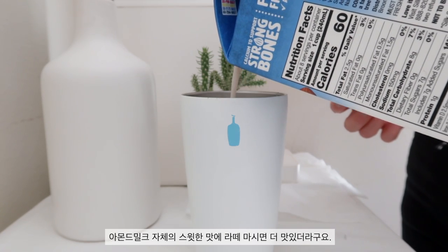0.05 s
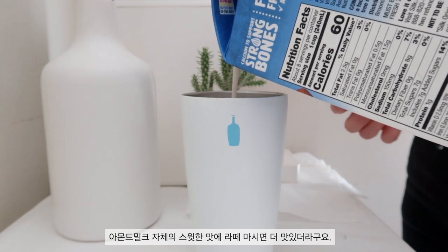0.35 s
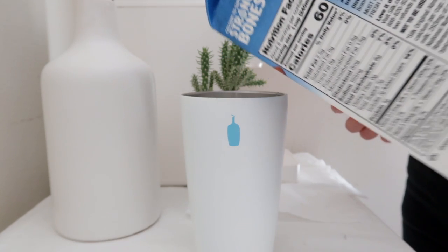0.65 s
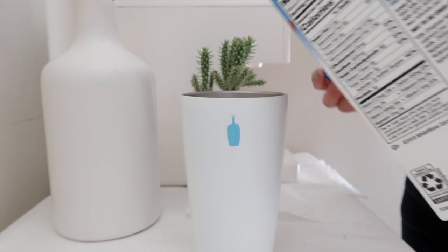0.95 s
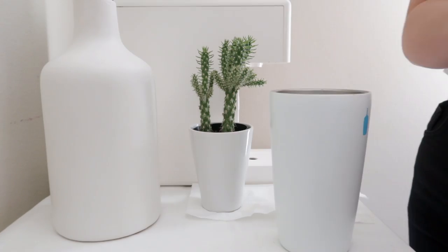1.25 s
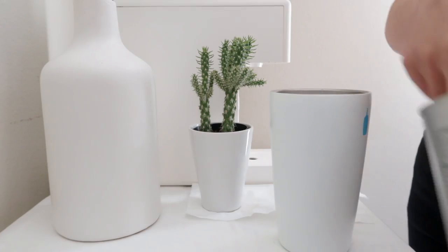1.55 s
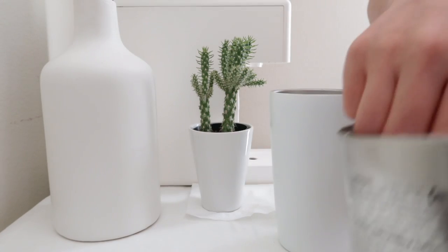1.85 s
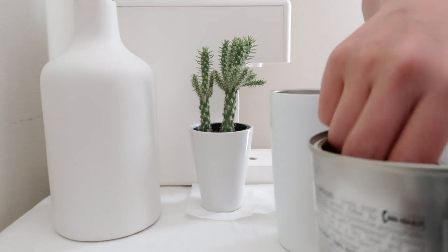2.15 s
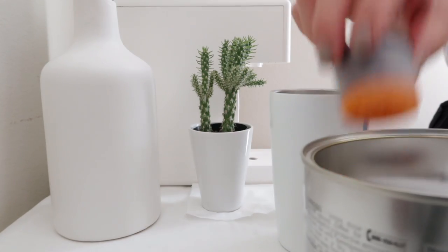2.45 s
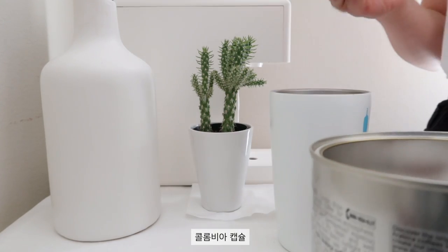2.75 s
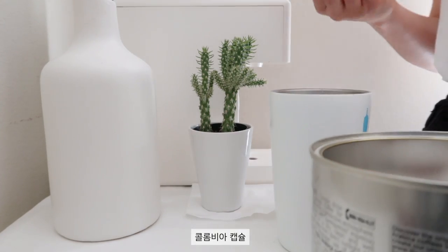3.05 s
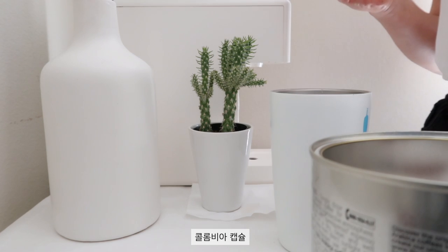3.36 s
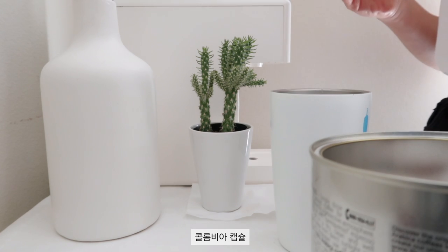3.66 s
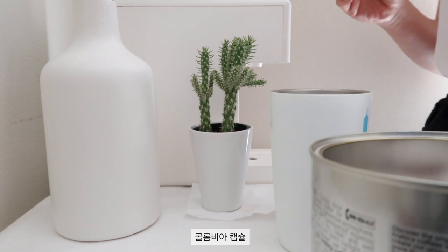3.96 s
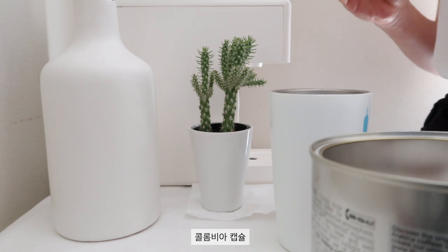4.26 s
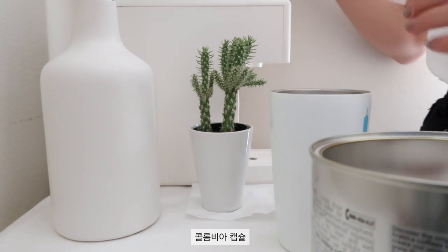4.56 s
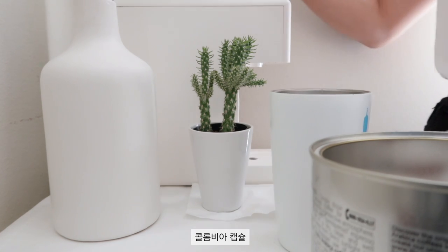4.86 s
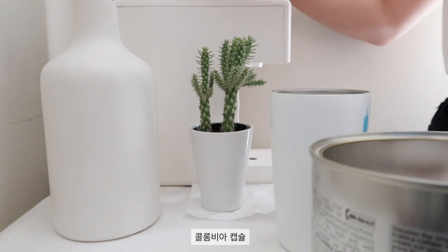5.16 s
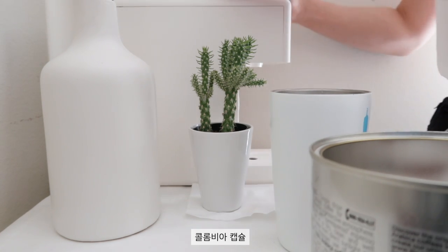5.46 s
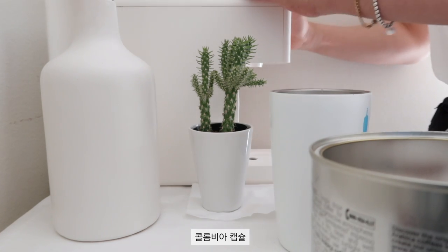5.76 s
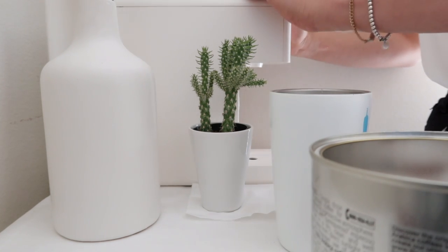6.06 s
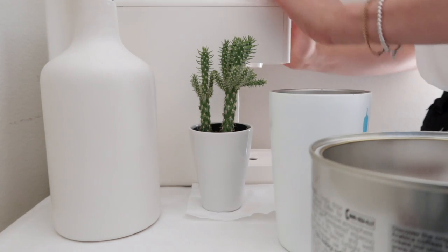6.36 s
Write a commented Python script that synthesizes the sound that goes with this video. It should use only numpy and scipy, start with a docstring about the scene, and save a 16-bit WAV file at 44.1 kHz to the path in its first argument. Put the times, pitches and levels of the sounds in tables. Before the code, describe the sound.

Right at the start, a drop plinks briefly into a cup in a quiet kitchen. From about 1.3 seconds a thin metal tin is pulled across the counter, scraping and knocking, and a hand rummages among the coffee capsules inside. They rattle and slide against the ringing wall, with the brightest clinks near 2.0 and 2.4 seconds, and settle by 2.8. A faint, distant motor hum rises with the rummaging, then slowly sinks in pitch and fades over soft room noise. Around 4.9 seconds an arm brushes softly past. Small plastic clicks follow from 5.2 as a coffee machine's lever opens, with a sharper clack and slight spring ring at 5.7. The capsule goes in with light rubbing and another clack near 6.2. At about 6.5 seconds the lid is pressed shut with two dull thumps that boom through the counter. The handling sounds close, with little reverberation.

```python
"""Loading a coffee machine

A drop plinks into a cup as its bubble rings. A metal tin is pulled across a kitchen counter and a hand
rummages for a capsule: impacts and stick-slip friction excite the modes of the thin wall. The lever of
a plastic coffee machine opens, the capsule drops in and the lid is pressed shut, with damped clacks
that boom through the counter. Behind it all lie faint room noise and a slowly sinking motor hum."""
import sys
import numpy as np
from scipy import signal
from scipy.fft import rfft, irfft
from scipy.io import wavfile
from scipy.ndimage import uniform_filter1d, map_coordinates

SR = 44100
rng = np.random.default_rng(int(sys.argv[2]) if len(sys.argv) > 2 else 0)


def inscribe(sig):
    """Save sig as 16-bit PCM at rate SR to the path in sys.argv[1].

    A 1-D sig is mono; a 2-D sig holds one channel per row.
    Samples are clipped to [-1, 1] before scaling.
    """
    pcm = np.round(np.clip(np.atleast_2d(sig).T, -1, 1) * 32767)
    wavfile.write(sys.argv[1], SR, pcm.astype(np.int16))


N = 291942
TIME = np.arange(N) / SR
HIT_SIZE = 8192   # samples in one impact

# edges of the six registers thud, body, clank, clink, ting and tick (frequency [Hz])
REGISTERS = [100, 450, 1100, 2100, 3500, 7500, 16000]
# two microphone ports cancel in the bass and oppose in the treble (frequency [Hz], side over mid [dB])
WIDTH = [(60, -36), (200, -29.5), (700, -25), (1300, -21), (2400, -12.5), (4400, -2.5), (6000, -2.5),
         (8000, 5.5), (15000, 7.5)]
# capsules and fingers striking the tin (time [s], strength [dB], contact time [s], chatter t60 [s],
# then for each of the struck spot's three modes: frequency [Hz], relative level [dB])
TIN_KNOCKS = [ (1.256,-52,0.00083,0.095,625,-46,1600,-53,1920,-63),
              (1.295,-44,0.0024,0.15,562,-32.5,930,-44,1380,-35),
              (1.3641,-48,0.0002,0.11,750,-29,965,-33.5,1438,-24),
              (1.377,-38,0.0027,0.04,518,-30,926,-30,1640,-35),
              (1.447,-48.5,0.0021,0.4,640,-41,1610,-40,2100,-42),
              (1.507,-47.5,0.00039,0.25,590,-32.5,1540,-32.5,3190,-42),
              (1.517,-43,.0025,0.11,581,-27,940,-38,1580,-37),
              (1.554,-43.5,0.00088,0.084,980,-34,1325,-27.5,3210,-32.5),
              (1.561,-38.5,0.00079,0.098,774,-29.5,1605,-29.5,2120,-36),
              (1.59,-36,0.0008,0.033,603,-32.5,2110,-28.5,2640,-30.5),
              (1.602,-50,0.00046,0.031,604,-41,1380,-45,3930,-39.5),
              (1.7084,-36.5,0.0038,0.035,650,-46.5,885,-27.5,1324,-31),
              (1.7795,-38.5,0.0018,0.016,713,-30.5,920,-34.5,1465,-29),
              (1.788,-30,0.001,0.05,602,-33,810,-25.5,1482,-27),
              (1.8186,-33.5,.002,0.03,629,-22.5,910,-31,1410,-29.5),
              (1.827,-41.5,0.00086,0.06,680,-46,1640,-29,2480,-35),
              (1.872,-39.5,.0018,0.026,616,-28,880,-31,1590,-37),
              (1.8798,-30.5,0.00096,0.024,581,-23,1405,-24,1576,-17),
              (1.8992,-35,0.00046,0.045,619,-29.5,1720,-25.5,3150,-39.5),
              (1.9233,-38,0.0018,0.015,578,-24,1360,-29.5,1520,-29),
              (1.9505,-41,0.00018,0.06,920,-35,1706,-34.5,2460,-28),
              (1.972,-45,.0004,0.048,584,-36,1710,-50,2600,-40.5),
              (1.983,-35.5,0.00015,0.092,546,-22.5,1757,-24.5,5115,-16),
              (2.013,-40,0.0017,0.028,560,-34.5,904,-45.5,1730,-42),
              (2.151,-52.5,0.00026,0.25,504,-38.5,1700,-47,2387,-44.5),
              (2.1995,-40,.005,.035,567,-27.5,956,-33,1643,-40.5),
              (2.218,-43.5,.005,0.022,590,-49,933,-43.5,1360,-49.5),
              (2.2453,-47,0.00039,0.075,520,-35,1480,-35,2240,-47),
              (2.279,-41.5,0.0025,0.13,620,-49,850,-47,1390,-50.5),
              (2.336,-45.5,0.00066,0.053,617,-32.5,1400,-40,2280,-39),
              (2.3559,-33,0.00057,0.1,634,-22,970,-25.5,1884,-22),
              (2.377,-36,0.0005,0.1,643,-21,1020,-30.5,1950,-21),
              (2.458,-41,0.00052,0.028,582,-20,1254,-34.5,2120,-41),
              (2.487,-45.5,0.00065,.07,649,-28.5,1390,-38,1710,-43),
              (2.498,-45.5,.0008,0.034,632,-37,1378,-29.5,1650,-33.5),
              (2.621,-53.5,0.00058,0.18,560,-53,2280,-59,5360,-65),
              (2.645,-39.5,.00096,0.049,545,-30,1043,-35.5,1456,-28),
              (2.757,-51.5,0.002,0.19,480,-47,1540,-48,2290,-64),
              (2.824,-70,0.00025,0.18,510,-54,3500,-60,5400,-62),
              (3.009,-76,0.00037,0.11,1850,-61.5,2085,-54,2700,-57)]
# high, lightly damped modes of the tin's wall (frequency [Hz], relative level [dB])
WALL_MODES = [(1512, -5.5), (1706, -7.5), (1912, -2.5), (2277, 3.5), (2558, -9), (2769, -9.5), (2859, -0.5),
              (3560, 3), (5124, 5.5), (5400, 2), (6271, 4.5)]


def from_db(db):
    """Amplitude ratio of a level in decibels."""
    return 10 ** (np.asarray(db) / 20)


def rms_one(x):
    """Normalisation to unit mean power."""
    return x / np.sqrt(np.mean(x ** 2) + 1e-20)


def in_time(points):
    """Linear interpolation of a curve at every sample."""
    return np.interp(TIME, *np.transpose(points))


def at_hz(points, hz):
    """Interpolation on a logarithmic frequency axis."""
    frequency, value = np.transpose(points)
    return np.interp(np.log(np.maximum(hz, 1)), np.log(frequency), value)


def bins(size):
    """Frequencies of a discrete Fourier transform."""
    return np.arange(size // 2 + 1) * SR / size


def drift(cutoff_hz):
    """Low-passed noise: a smooth random fluctuation of unit power."""
    white = rfft(rng.standard_normal(N))
    return rms_one(irfft(white / (1 + (bins(N) / cutoff_hz) ** 2), N))


def stereo(pair, width=WIDTH):
    """Sum and difference turn mid and side spectra into left and right."""
    side = from_db(at_hz(width, np.linspace(0, SR / 2, pair.shape[-1])))
    return (pair[0] + side * pair[1] * [[1], [-1]]) / np.sqrt(1 + side ** 2)


def widened(tone):
    """A side signal in quadrature sets left and right apart in phase."""
    spectrum = rfft(tone)
    return irfft(stereo(np.array([spectrum, 1j * spectrum])), len(tone))


def noise(spectrum, width=WIDTH):
    """Stationary stereo noise of a given spectral shape and unit power."""
    white = rfft(rng.standard_normal((2, N)))
    return rms_one(irfft(stereo(white, width) * from_db(at_hz(spectrum, bins(N))), N))


def ring(hz, t60, swell_s):
    """Free vibration of one mode: a sinusoid that builds up and decays exponentially."""
    t = np.arange(HIT_SIZE) / SR
    return np.exp(-np.log(1000) * t / t60) * (1 - np.exp(-t / swell_s)) * np.sin(2 * np.pi * hz * t)


def rings(rows, swell_s):
    """Superposition of decaying modes, each shortened further by a linear fade."""
    out = np.zeros(N + HIT_SIZE)
    fade = np.linspace(1, 0, HIT_SIZE)
    for s, hz, db, t60 in rows:
        at = int(s * SR)
        out[at:at + HIT_SIZE] += from_db(db) * ring(hz, t60, swell_s) * fade
    return out[:N]


def resonance(hz, centre, width):
    """Frequency response of a two-pole resonator with unit peak gain."""
    delay = np.exp(-2j * np.pi * hz / SR)
    radius = np.exp(-np.pi * width / SR)
    poles = 1 - 2 * radius * np.cos(2 * np.pi * centre / SR) * delay + (radius * delay) ** 2
    return (1 - radius ** 2) / 2 * (1 - delay ** 2) / poles


def body(modes, size, dense_db, dense_hz):
    """Modal superposition: an object's main resonances stand over a bed of dense, damped ones."""
    # valleys where the response sinks (frequency [Hz], bandwidth [Hz], depth [0-1])
    valleys = [(480, 150, 0.7), (3740, 690, 0.4), (7420, 5900, 0.53), (14500, 2500, 0.2)]
    hz = bins(size)
    response = from_db(dense_db) / (1 + 1j * hz / dense_hz)
    for centre, width, db in modes:
        response += from_db(db) * resonance(hz, centre, width)
    for centre, width, depth in valleys:
        response *= 1 - depth * resonance(hz, centre, width)
    return response


def motor(steady_hz=42.15, slows_from_s=1.85, sag_hz_per_s=1.12, wander_hz=.06, waver_db=1.2):
    """A distant motor hums at multiples of its rotation rate, so its pitch sinks as it slows."""
    # partials of the hum (multiple of the rotation rate, relative level [dB])
    orders = [(2, -3), (3, -9.5), (4, -7), (4.5, -9.5), (6, -10), (7, -4), (10, -12)]
    # rise and fall of hum and rumble (time [s], level [dB])
    loudness = [(0, -74), (1.21, -73), (1.28, -53), (1.8, -51), (2.3, -59.5), (3.65, -52), (4.5, -59.5),
                (6.62, -68)]
    # standing waves of the room lift partials passing through (frequency [Hz], width [Hz], lift [dB])
    standing_waves = [(80.6, 1.1, 5), (115.66, 3.2, 15.5)]
    # rumble under the hum (frequency [Hz], relative spectral density [dB])
    rumble = [(30, -32.5), (60, -10), (120, -7), (200, -11.5), (280, 0.5), (400, -4.5), (500, -21),
              (900, -29.5), (16000, -91)]
    motor_db = in_time(loudness)
    rate = steady_hz - sag_hz_per_s * np.maximum(TIME - slows_from_s, 0)
    angle = 2 * np.pi * np.cumsum(rate + wander_hz * drift(2.4)) / SR
    hum = 0
    for multiple, db in orders:
        lift_db = sum(peak_db / (1 + (2 * (multiple * rate - hz) / width) ** 2)
                      for hz, width, peak_db in standing_waves)
        level_db = motor_db + db + waver_db * drift(7.2) + lift_db
        hum += from_db(level_db) * np.sin(multiple * angle + rng.uniform(0, 2 * np.pi))
    return from_db(1) * hum + from_db(motor_db - 7.5) * noise(rumble)


def room_noise():
    """Ambient noise in two slowly modulated layers: a deep rumble and a wider hiss."""
    # colours of the two layers (frequency [Hz], relative spectral density [dB])
    deep_spectrum = [(20, -9.5), (35, -17.5), (53, -0.5), (68, -2.5), (100, -14), (300, -47), (16000, -110)]
    hiss_spectrum = [(20, -26.5), (60, -12), (80, -4.5), (130, -5), (200, -9), (270, -2.5), (350, -17),
                     (600, -20), (1500, -25), (3500, -30.5), (4050, -31), (5000, -33.5), (12000, -45),
                     (14000, -73.5)]
    # their envelopes; the hiss sinks during the rummaging and comes back as it ends (time [s], level [dB])
    deep_level = [(0, -63), (.8, -62), (2.5, -66.5), (4.8, -59.5), (6, -63.5), (6.62, -56.5)]
    hiss_level = [(0,-61.5), (1.2,-62), (2.6,-66.5), (3.15,-62.5), (3.4,-61), (4.05,-60.5), (4.7,-61.7),
                  (6.62,-61)]
    # stereo spread of the hiss (frequency [Hz], side over mid [dB])
    hiss_width = [(60, -80), (110, -21.5), (200, -17.5), (380, 0), (700, -1), (2000, 1), (8000, 1),
                  (15000, 3)]
    deep = from_db(in_time(deep_level)) * noise(deep_spectrum)
    hiss = from_db(in_time(hiss_level)) * noise(hiss_spectrum, hiss_width)
    return deep + hiss


def drop():
    """Bubble resonance: a drop taps the surface in the cup, then the trapped air rings."""
    # partials of tap and bubble (time [s], frequency [Hz], level [dB], nominal t60 [s])
    plinks = [(.0332,1260,-36,0.0079), (.0335,2150,-40,0.0075), (.0332,3650,-41,0.0037),
              (.064,2063,-32.5,0.028), (.064,3240,-44,0.0061), (.0645,2310,-57,0.012),
              (.0646,1005,-53,0.055), (.065,1330,-44,.014), (.08,2170,-53,.014), (.0895,2020,-49,0.013)]
    return rings(plinks, swell_s=.0011)


def friction(strokes, knocks=(), stir_db=0, attack_s=.018, release_db_per_s=142.5, settle_db_per_s=157):
    """Envelope of rubbing: strokes and loose parts stirred by knocks are incoherent, so powers add."""
    power = np.zeros(N)
    for s, length, db in strokes:
        swell = np.clip((TIME - s) / attack_s, 0, 1)
        release_db = release_db_per_s * np.maximum(TIME - s - length, 0)
        power += (swell * from_db(db - release_db)) ** 2
    settling = from_db(stir_db - settle_db_per_s * TIME[:SR]) ** 2
    for s, db, *_ in knocks:
        at = int(s * SR)
        power[at:at + SR] += from_db(db) ** 2 * settling[:N - at]
    return np.sqrt(power)


def scrape(level, response, slips_per_s=2200, spread_db=2.5):
    """Stick-slip friction: a random train of tiny impulses drives an object's response."""
    slips = rng.random(N) < slips_per_s / SR
    strength = from_db(spread_db * np.minimum(rng.exponential(1, N), 4))
    force = stereo(rfft(slips * strength * rng.standard_normal((2, N))))
    return rms_one(irfft(force * response, N)) * level


def flexed(x, pitch_share=.018, flex_hz=14):
    """Frequency modulation: the hand flexes the wall, so its resonances waver."""
    shift = np.cumsum(pitch_share * drift(flex_hz))
    at = np.arange(N) + shift - uniform_filter1d(shift, SR // 4)   # less its trend, to keep the timing
    return np.array([map_coordinates(channel, [at], order=3) for channel in x])


def softened(hz, contact_s, edge_share=.1):
    """An impact acts as a low-pass (gain in dB): the longer the contact, the less treble."""
    cycles = hz * contact_s
    return -20 * np.log10(1 + cycles ** 2) - 10 * np.log10(1 + (cycles * edge_share) ** 2)


def register_gains(db, contact_s, thud_db, colour_db):
    """The object's colour and the contact time set a blow's amplitude in each register."""
    centres = np.sqrt(np.multiply(REGISTERS[1:-1], REGISTERS[2:]))
    softening_db = softened(centres, contact_s)
    upper_db = colour_db + softening_db[1:] - softening_db[0]
    return from_db(db + np.array([thud_db, 0, *upper_db]))


def spot(modes, t60, swell_cycles, knee_hz=600, damping=.37, split=.0041):
    """Mode splitting: an uneven wall rings in beating pairs, which die sooner above the knee."""
    tone = 0
    for hz, db in zip(modes[::2], modes[1::2]):
        decay_s = t60 * (knee_hz / max(hz, knee_hz)) ** damping
        pair = sum(ring(hz * (1 + side * split), decay_s, swell_cycles / hz) for side in (-1, 1))
        tone += from_db(db) * pair / 2
    return widened(tone)


def blows(rows, response, thud_db, colour_db, chatter_db, contact_db, crack_db, crack_s, rise_s,
          spot_db, spot_t60, swell_cycles, detune):
    """Impact excitation: a push, a crack and loose parts' chatter drive the body; the spot rings."""
    t, hz = np.arange(HIT_SIZE) / SR, bins(HIT_SIZE)
    attack = int(.018 * SR)
    age = t * (t < t[-attack])   # the end of the buffer wraps round to become the lead-in
    filters = [signal.butter(6, edges, "band", fs=SR, output="sos")
               for edges in zip(REGISTERS, REGISTERS[1:])]
    bands = np.abs([signal.sosfreqz(sos, hz, fs=SR)[1] for sos in filters])
    treble_decay = from_db(-.025 * np.outer(REGISTERS[:-1], age))   # dB per second per Hz
    push = from_db(contact_db) / (1 + 1j * hz / REGISTERS[3]) * np.array([[1], [0]])   # mid only
    out = np.zeros((2, N + HIT_SIZE))
    for s, db, contact_s, t60, *spot_modes in rows:
        crack = from_db(crack_db) * np.exp(-t / crack_s)
        envelope = (np.exp(-np.log(1000) * t / t60) + crack) * (1 - np.exp(-t / rise_s))
        chatter = rfft(rng.standard_normal((2, HIT_SIZE)) * envelope) / np.linalg.norm(envelope)
        # the changing grip shifts the resonances a little from blow to blow
        gripped = np.interp(hz * (1 + detune * rng.standard_normal()), hz, response)
        parts = irfft(bands[:, None] * gripped * stereo(push + chatter)) * treble_decay[:, None]
        attack_rms = np.sqrt(np.mean(parts[..., :attack] ** 2, axis=(1, 2)))
        gains = register_gains(db + chatter_db, contact_s, thud_db, colour_db)
        hit = np.tensordot(gains / attack_rms, parts, 1)
        hit += from_db(spot_db) * spot(spot_modes, spot_t60, swell_cycles)
        at = int(s * SR) - attack
        out[:, at:at + HIT_SIZE] += np.roll(hit, attack, axis=1)
    return out[:, :N]


def tin():
    """Forced vibration of a thin metal shell, knocked and scraped by the capsules inside."""
    # resonances of the tin (frequency [Hz], bandwidth [Hz], gain [dB])
    modes = [(268, 18, 8), (578, 39, 9.5), (625, 76, 12), (780, 58, 1.5), (939, 18, 9), (1210, 18, -5.5),
             (1408, 270, 7.5), (1470, 28, 4), (1710, 26, 11), (1800, 14, 3), (2280, 60, 0),
             (2450, 45, -9.5), (2590, 20, -6), (2720, 31, -4.5), (3200, 26, -5.5), (3660, 50, 3),
             (3860, 90, -5), (4800, 57, -1), (5410, 61, -4), (5290, 90, -4.5), (6200, 35, -8.5),
             (6640, 60, -8), (7700, 100, -10.5), (10000, 180, -12), (12850, 300, -10.5)]
    # a perfectly hard blow in clank, clink, ting and tick (level over the body register [dB])
    colour_db = [2.8, 6.96, 8.8, 11.8]
    # pushes of tin and hand make the capsules slide (time [s], duration [s], relative level [dB])
    slides = [(1.255,0.46,-43.5), (1.785,0.075,-39), (1.85,.012,-34.5), (2.02,0.071,-40), (2.14,0.022,-61),
              (2.29,0.18,-37), (2.33,.021,-33.5), (2.75,0.11,-55.5)]
    response = body(modes, HIT_SIZE, dense_db=-11, dense_hz=2510)
    response /= 1 + (bins(HIT_SIZE) / 12800) ** 10   # the wall radiates little at the very top
    # the light tin hardly stirs the counter, so its thud is weak
    knocks = blows(TIN_KNOCKS, response, thud_db=-8.5, colour_db=colour_db, chatter_db=-2.5,
                   contact_db=-9, crack_db=-14.5, crack_s=.0015, rise_s=.001,
                   spot_db=1.5, spot_t60=.065, swell_cycles=1.4, detune=.03)
    # light sliding is a soft contact that mostly stirs the lower resonances
    soft = 1 / (1 + 1j * bins(N) / 7000) ** 3
    lower_modes = [mode for mode in modes if mode[0] < REGISTERS[4]]
    spurts = rms_one(from_db(2 * drift(cutoff_hz=45)))   # the capsules stick and slip
    level = friction(slides, TIN_KNOCKS, stir_db=-4) * spurts
    sliding = scrape(level, body(lower_modes, N, dense_db=-2.5, dense_hz=4000) * soft)
    wall = sum(from_db(db) * resonance(bins(N), hz, width=45) for hz, db in WALL_MODES)
    shimmer = scrape(level, wall * soft ** 2)
    rubbing = flexed(from_db(-13) * sliding + from_db(-22) * shimmer)
    return from_db(-4) * knocks + rubbing


def singing_wall(scatter_db=4, detune=.014, t60=.19):
    """Free decay of the tin's wall after each knock; spot and grip vary each mode's level and pitch."""
    partials = []
    for s, db, contact_s, *_ in TIN_KNOCKS:
        for hz, mode_db in WALL_MODES:
            place, grip = rng.standard_normal(2)
            level_db = db + mode_db + scatter_db * place + softened(hz, contact_s)
            partials.append((s, hz * (1 + detune * grip), level_db, t60))
    return from_db(-16.5) * widened(rings(partials, swell_s=.00096))


def foil():
    """Stick-slip friction of the capsules' sharp foil rims on the wall makes a crisp hiss."""
    # scratches along the wall (time [s], duration [s], level [dB])
    scratches = [(1.357,0.013,-56), (1.5,0.013,-57), (1.775,0.018,-86), (1.86,.02,-69.5),
                 (1.89,0.014,-54.5), (2.345,0.058,-58)]
    # colour of the hiss (frequency [Hz], relative spectral density [dB])
    spectrum = [(4000,-28), (7500,-3), (9000,0), (12500,-0.5), (14500,-7.5), (16000,-14.5)]
    level = friction(scratches, release_db_per_s=499)
    return scrape(level, from_db(at_hz(spectrum, bins(N))), slips_per_s=2500, spread_db=-3)


def capsule():
    """A loose capsule clips the tin's rim, and both ring at their natural frequencies."""
    # clinks against the rim (time [s], relative level [dB])
    clinks = [(1.592, -51.5), (1.9846, -26), (2.152, -55), (2.357, -22), (2.377, -26)]
    # modes of the capsule's thin cup (frequency [Hz], relative level [dB], nominal t60 [s])
    modes = [(2324, 6.5, 0.025), (2510, -6, .06), (2660, -5.5, .08), (2776, -3, 0.063), (2808, -2, 0.058)]
    # overtones that stand out on a square hit (time [s], frequency [Hz], level [dB], nominal t60 [s])
    rim_rings = [ (1.709,1500,-38,.06), (1.788,2880,-38,.05), (1.797,925,-30.5,.07), (1.857,1640,-36,.06),
                 (1.8994,3206,-35.5,.13), (1.9492,4900,-32.5,.06), (1.956,2550,-37.5,.09),
                 (1.983,2243,-23.5,.07), (1.983,2502,-26,.07), (1.983,4920,-35.5,.06),
                 (1.983,5470,-24,0.072), (1.983,6240,-28.5,0.053), (1.983,6740,-38.5,.06),
                 (1.983,13100,-37,.035), (2.152,2413,-46,.16), (2.3557,1064,-31,.06),
                 (2.3557,2550,-37.5,.06), (2.38,2134,-35.5,.07), (2.38,3574,-42,.17), (2.645,3500,-62,.2),
                 (2.645,5240,-69,.25)]
    partials = [(s, hz, db + mode_db, t60) for s, db in clinks for hz, mode_db, t60 in modes]
    return widened(from_db(-1) * rings(partials, swell_s=.001) + rings(rim_rings, swell_s=.0012))


def machine():
    """Impacts and friction drive a damped plastic housing, which is coupled to the counter."""
    # the arm brushes past, then the hand rubs the housing (time [s], duration [s], relative level [dB])
    brushes = [(4.9,0.28,-74), (5.0,.04,-69.5)]
    rubs = [(4.9, 0.19, -58.5), (5.6, 0.14, -46.5), (6.17, 0.093, -49), (6.41, 0.071, -44)]
    # hiss of the arm (frequency [Hz], relative spectral density [dB])
    brush_spectrum = [(300,-18), (900,0), (3000,-4), (5000,-7.5), (8000,-20), (15000,-28.5)]
    # impacts of lever, capsule and lid (columns as in TIN_KNOCKS)
    impacts = [ (5.231,-63.5,0.00031,0.13,300,-55,1450,-58,2880,-56),
               (5.259,-49,.00018,0.073,256,-44,1454,-38.5,1975,-35),
               (5.324,-61,0.00055,0.056,272,-54.5,1360,-55,2220,-57),
               (5.366,-61.5,0.00055,0.12,244,-45.5,1724,-48.5,2080,-58),
               (5.519,-59,0.00045,0.069,376,-62,1385,-55,1870,-51),
               (5.578,-55.5,0.00013,0.081,434,-39.5,1650,-49,3700,-60),
               (5.601,-57.5,0.00049,0.045,420,-60,1910,-55,3750,-47),
               (5.6514,-38,0.00021,0.086,740,-34,1672,-23,2940,-21.5),
               (5.673,-47.5,0.00041,0.06,327,-26,1550,-34,1950,-31),
               (5.693,-52,0.00031,0.29,393,-42,1400,-41,1970,-34),
               (5.709,-51.5,0.00055,0.063,294,-46,846,-34,1300,-60),
               (5.794,-60.5,0.00048,.043,260,-60.5,1630,-54.5,2980,-57),
               (5.865,-59,0.0005,0.16,264,-55,804,-52.5,1900,-56),
               (6.03,-54.5,0.00022,0.21,249,-37,1600,-62,1990,-50),
               (6.151,-62,0.00019,0.037,430,-58,1700,-55,2850,-55),
               (6.1568,-47,0.00018,0.044,415,-41,1152,-33.5,1720,-43),
               (6.177,-65,0.00061,0.065,720,-42.5,1220,-39,1430,-45),
               (6.26,-56,0.00014,0.094,338,-36.5,1550,-44,2250,-46),
               (6.404,-56,0.00051,0.14,240,-42,910,-59,1620,-59),
               (6.465,-49,0.00023,.058,567,-33.5,905,-58,1750,-38),
               (6.553,-42,0.0016,0.022,264,-26,562,-32,713,-32)]
    # resonances of the housing (frequency [Hz], bandwidth [Hz], gain [dB])
    modes = [(124, 19, 6), (268, 39, 14.5), (354.5, 35, 18), (442, 130, 10), (770, 60, 5), (1377, 150, 2.5),
             (1656, 80, 3), (2090, 150, -7), (2885, 190, -5.5), (5200, 120, -14)]
    # a perfectly hard blow in clank, clink, ting and tick (level over the body register [dB])
    colour_db = [1.7, 0.92, 1.6, 4.2]
    # spring and latch ring after they snap; the counter booms under the pressed machine
    # (time [s], frequency [Hz], level [dB], nominal t60 [s])
    spring = [(5.653, 2850, -53, .33), (5.653, 2960, -54, 0.6), (5.653, 5260, -55, 0.26),
              (6.158, 1183, -40, 0.086)]
    booms = [(5.652, 358.4, -22, 0.091), (6.158, 125, -45, 1), (6.4655, 230, -10.5, 0.025),
             (6.47, 126, -37, 0.13), (6.553, 123, -27.5, 0.089)]
    response = body(modes, HIT_SIZE, dense_db=-2.5, dense_hz=2960)
    # the heavy machine knocks through the counter, so its thud is strong
    clacks = blows(impacts, response, thud_db=2, colour_db=colour_db, chatter_db=-.36,
                   contact_db=-21.5, crack_db=-28, crack_s=.0042, rise_s=.0015,
                   spot_db=2.3, spot_t60=.048, swell_cycles=.87, detune=.032)
    rub_response = body(modes, N, dense_db=-38, dense_hz=1420)
    rubbing = scrape(friction(rubs, impacts, stir_db=-26), rub_response, slips_per_s=2300, spread_db=1.5)
    brushing = friction(brushes) * noise(brush_spectrum)
    ringing = rings(spring, swell_s=.002) + rings(booms, swell_s=.0053)
    return from_db(-1.5) * clacks + from_db(-8) * rubbing + brushing + ringing


def kitchen(x, first_wall_s=.0077):
    """Reverberation: diffuse reflections decay exponentially, each band at its own rate."""
    # reverberation time of the kitchen (frequency [Hz], t60 [s])
    decay_times = [(150, 0.32), (600, 0.25), (1500, 0.15), (4000, 0.087), (12000, 0.17)]
    size = HIT_SIZE * 2
    t, tail = np.arange(size) / SR, 0
    for low, high in zip(REGISTERS, REGISTERS[1:]):
        bandpass = signal.butter(2, [low, high], "band", fs=SR, output="sos")
        band = signal.sosfilt(bandpass, rng.standard_normal((2, size)))
        tail += band * from_db(-60 * t / at_hz(decay_times, np.sqrt(low * high)))
    tail = irfft(stereo(rfft(tail * (t > first_wall_s))))
    return signal.fftconvolve(x[:1], rms_one(tail) / np.sqrt(size), axes=1)[:, :N]


def scene():
    """Superposition of direct sound, reverberation and background in a quiet kitchen."""
    rummaging = tin() + singing_wall() + capsule() + foil()
    loading = machine()
    plink = drop()
    reverberation = kitchen(from_db(-13) * rummaging + from_db(-12.5) * loading + from_db(-10.5) * plink)
    slightly_right = from_db([[-.3], [.3]])
    return motor() + room_noise() + plink + rummaging * slightly_right + loading + reverberation


def record(dry, cutoff_hz=15800):
    """An elliptic low-pass filter cuts the highest treble steeply."""
    return signal.sosfilt(signal.ellip(10, .2, 80, cutoff_hz, fs=SR, output="sos"), dry)


dry = scene()
out = record(dry)
inscribe(out)
```